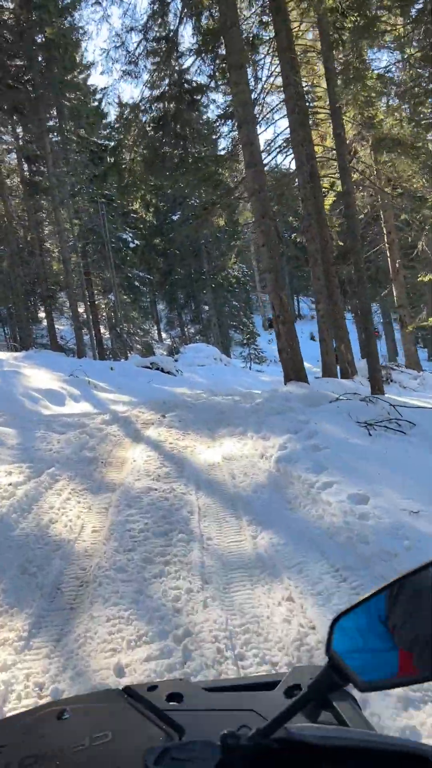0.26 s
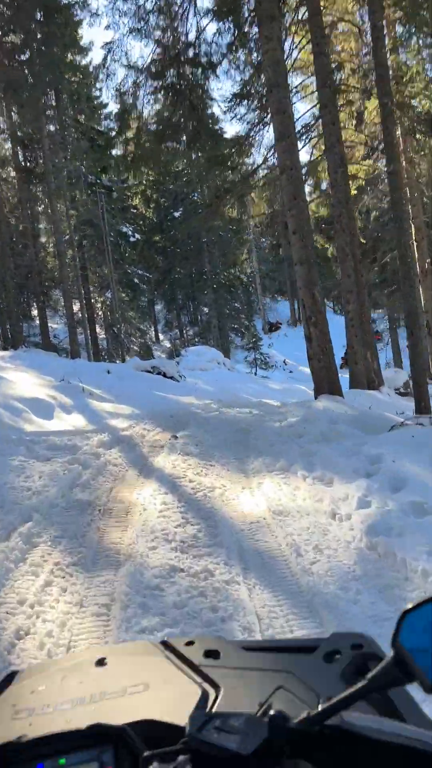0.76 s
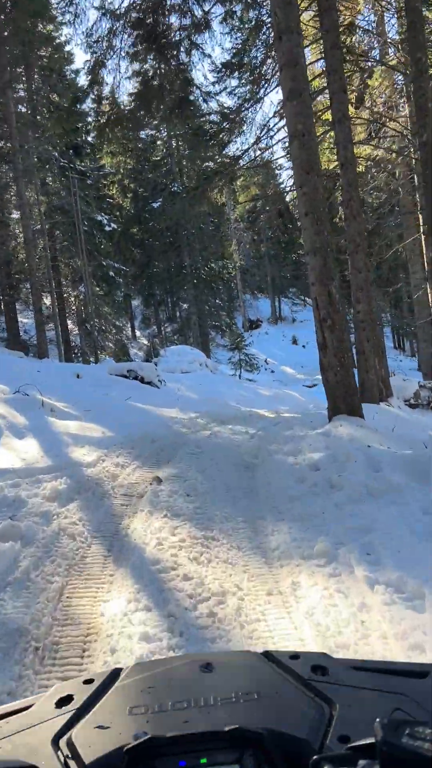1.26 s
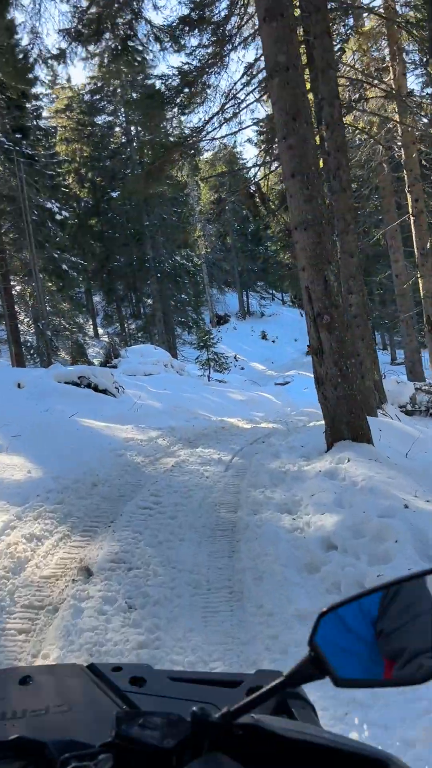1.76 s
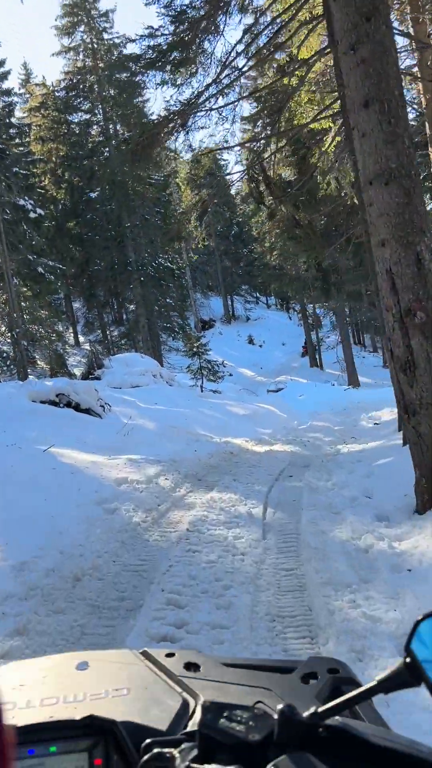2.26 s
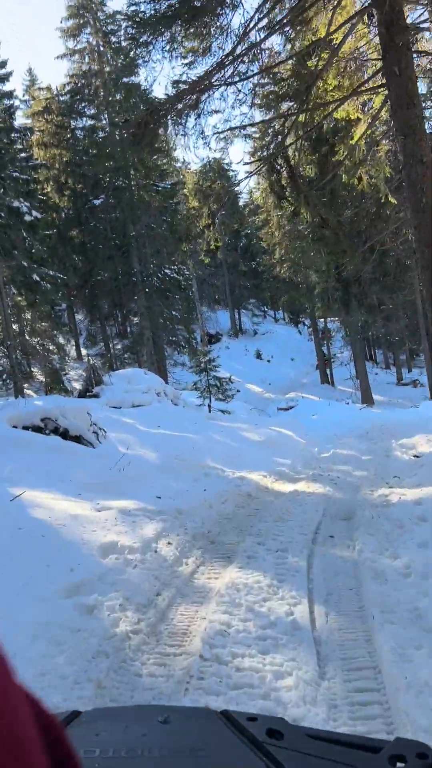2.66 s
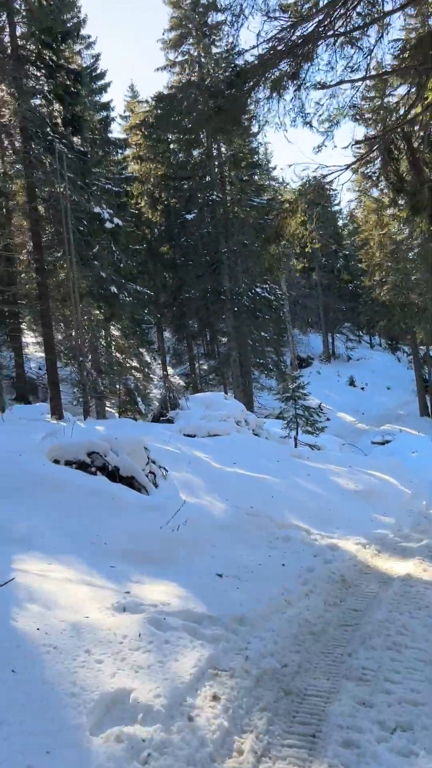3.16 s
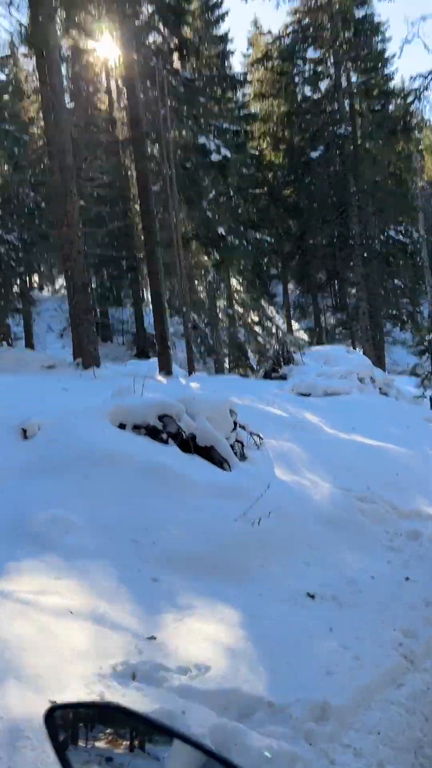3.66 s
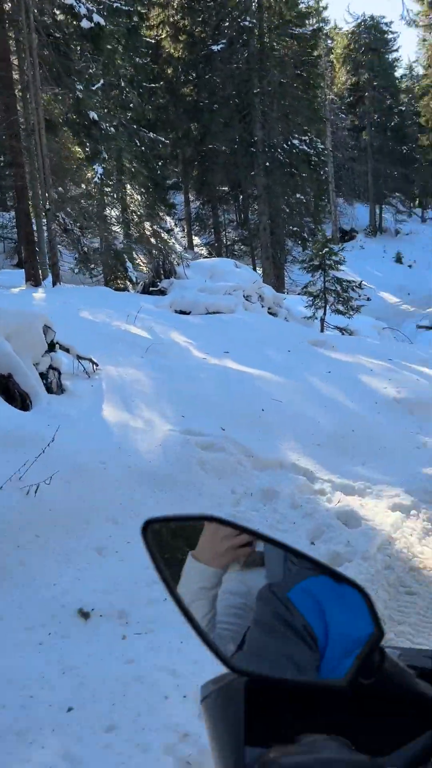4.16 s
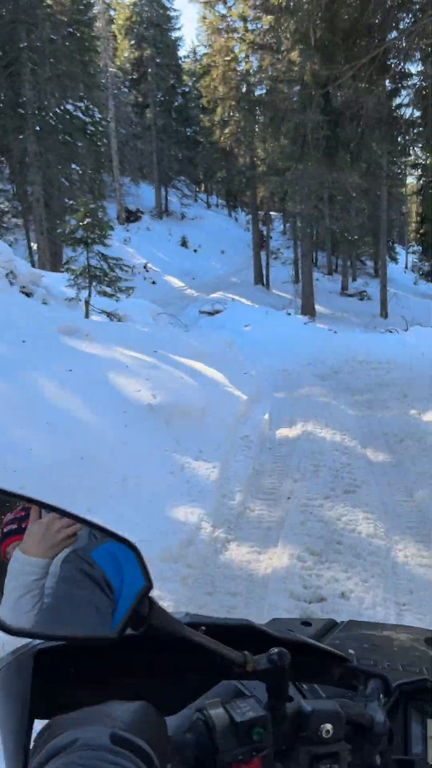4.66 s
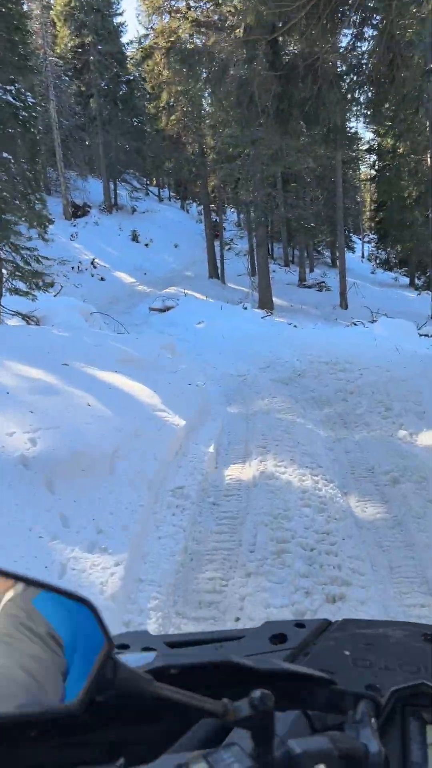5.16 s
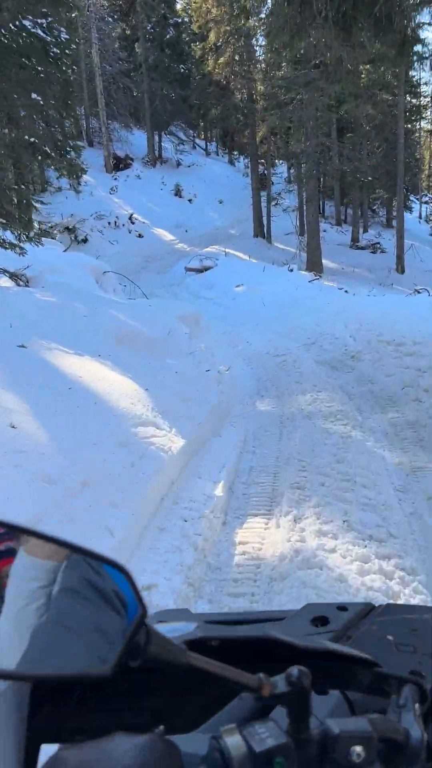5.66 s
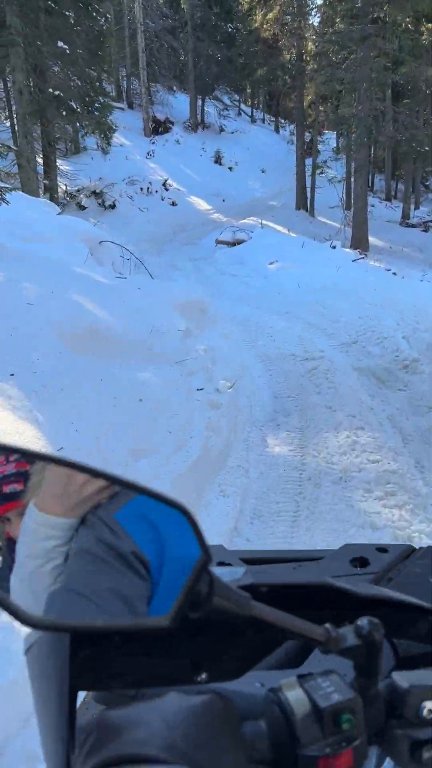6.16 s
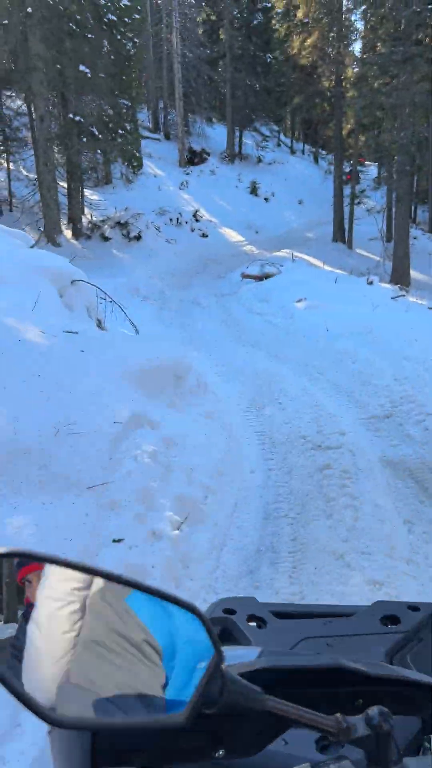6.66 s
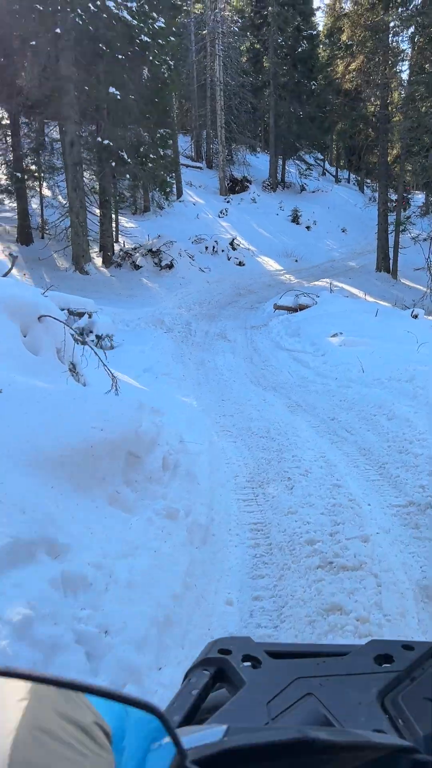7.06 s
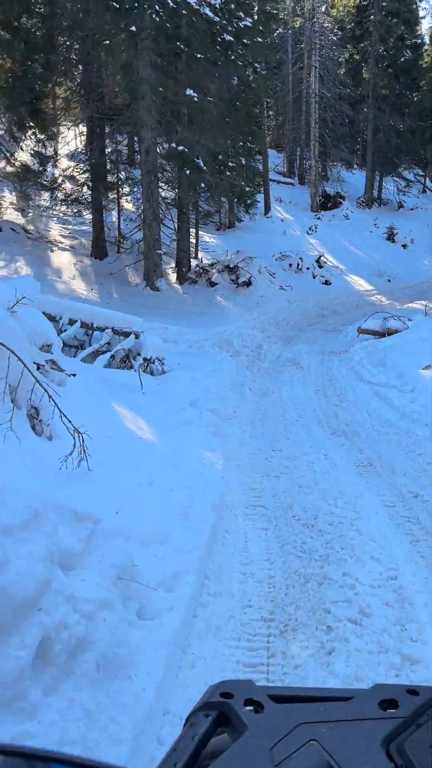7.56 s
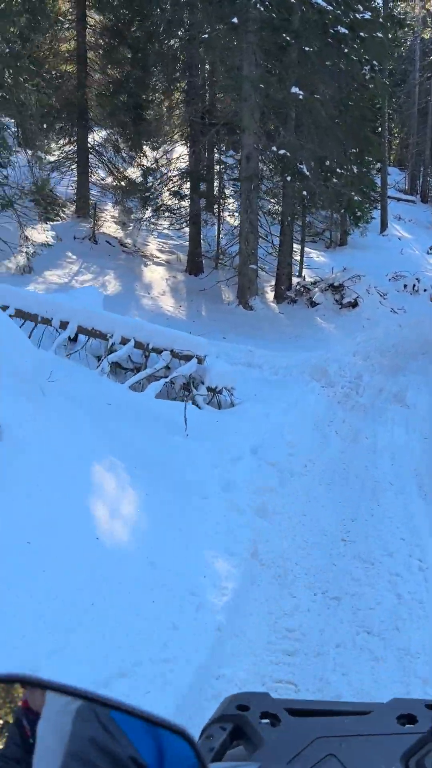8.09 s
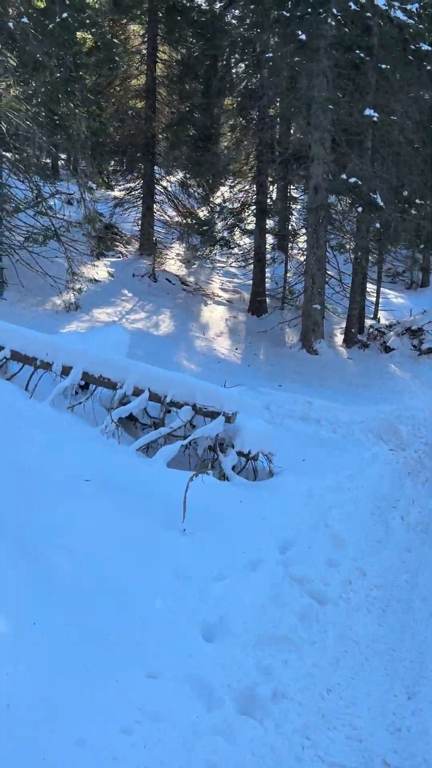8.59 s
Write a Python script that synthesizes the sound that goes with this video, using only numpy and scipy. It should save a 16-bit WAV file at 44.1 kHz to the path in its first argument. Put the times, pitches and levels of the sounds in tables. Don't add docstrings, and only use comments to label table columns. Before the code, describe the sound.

Heard from the saddle on a hand-held phone outdoors, a single-cylinder engine pulls hard with a rough, raspy drone and wind rumbling on the microphone. After about two and a half seconds, tiny high squeaks and a sharp gust mark the throttle closing. The engine drops to a lower, softer hum, swells mildly and eases again, over metallic ticking, hissing churned snow and low thumps from ruts.

```python
import sys
import numpy as np
from scipy import signal
from scipy.fft import rfft, irfft, next_fast_len
from scipy.io import wavfile
from scipy.ndimage import uniform_filter1d, map_coordinates

SR = 44100
rng = np.random.default_rng(int(sys.argv[2]) if len(sys.argv) > 2 else 0)


def volts_from_db(level):
    exponent = np.asarray(level, float) / 20
    return 10 ** exponent


def digitize_waveform(pressure):
    field = np.atleast_2d(pressure).T
    bounded = np.clip(field, -1, 1)
    quanta = np.round(bounded * 32767).astype(np.int16)
    wavfile.write(sys.argv[1], SR, quanta)


N = 389403

# (time [s], firing rate [Hz], exhaust effort [dB])
ENGINE = [(0.0, 40.02, -13), (0.37, 42.4, -16.5), (1.06, 39.74, -22), (2.09, 40.87, -22), (2.46, 39.9, -22),
          (2.75, 35.25, -23.5), (3.61, 34.22, -27), (3.86, 34.58, -23), (4.38, 37.55, -19),
          (4.67, 35.8, -21.5), (5.63, 34.77, -21.5), (5.9, 35.44, -20), (6.17, 34.4, -21.5),
          (6.39, 33.95, -23.5), (6.79, 36.08, -20.5), (7.8, 36.38, -21.5), (8.16, 34, -24.5),
          (8.83, 33.98, -25.5)]


def crank():
    firing_hz = curves(ENGINE)[0] * (1 + .003 * wobble(10))
    return np.cumsum(firing_hz) / SR + .07


def effort_swing():
    effort_db = curves(ENGINE)[1]
    return effort_db - effort_db.mean()


# (time [s], throttle opening [0-1])
THROTTLE = [(0, 0.82), (2.42, 0.83), (2.5, 0.43), (2.75, 0.24), (3.8, 0.32), (4.2, 0.4), (4.6, 0.05),
            (6.4, 0.14), (6.7, 0.26), (7.8, 0.24), (8.1, 0), (8.83, 0.01)]


def load():
    return np.clip(curves(THROTTLE)[0], 0, 1)


# (order, level re mean effort shut [dB], part open [dB], open [dB], growth [dB per dB effort])
STRONG_ORDERS = [(2, -13, -8.5, 7, .5), (4, 0, 1, -1, 1), (5, -16, -11.5, -1.5, 0.77),
                 (6, -13.5, -8.5, -17.5, 1.73), (7, -29, -13, -8.5, 1.32)]
# (order, level re roar open [dB], level re roar shut [dB])
WEAK_ORDERS = [(1, -5.5, -8), (3, -0.5, -4.5), (8, -4.5, -2), (9, -10.5, -16), (10, -12.5, -18.5),
               (14, -2, -26), (18, -14, -32), (20, -13.5, -29), (22, -46, -12), (24, -26, -12)]
# (frequency [Hz], width [Hz], level [dB])
PIPE = [(450, 70, -6), (565, 26, 3), (720, 24, 4), (808, 24, 3), (930, 26, -5), (1035, 35, -6)]
PART_OPEN = .3
LOPE_DB = 1.5
WEAK_PER_EFFORT = 0.1
SKEW_TURNS, RETURN_TURNS = .16, -.35


def exhaust(cycles):
    swing_db, flow_db, pull = effort_swing(), roar_db(), load()
    mean_db = curves(ENGINE)[1].mean()
    levels = {}
    for order, *steps_db, growth in STRONG_ORDERS:
        lope_db = (order != 4) * LOPE_DB * (1 - pull) * wobble(7)
        throttle_db = np.interp(pull, [0, PART_OPEN, 1], steps_db)
        levels[order] = mean_db + growth * swing_db + throttle_db + lope_db
    for order, open_db, shut_db in WEAK_ORDERS:
        levels[order] = flow_db + WEAK_PER_EFFORT * swing_db + shut_db + pull * (open_db - shut_db)

    tone = np.zeros(N)
    for order, db in levels.items():
        lag = (order % 2) * np.sign(order - 4) * SKEW_TURNS + (order == 6) * RETURN_TURNS
        waver = volts_from_db(.6 * order ** .4 * wobble(12))
        tone += np.sqrt(2) * volts_from_db(db) * waver * np.cos(2 * np.pi * (order * cycles - lag))

    firing = beats(cycles, scatter_db=3.0)
    firing = firing + (.7 - 0.12 * pull) * beats(cycles + .5, scatter_db=0.3)
    pipe_ring = unit(filtered(firing, lambda f: modes(PIPE)(f) * (f > 350)))
    tone += volts_from_db(flow_db + 0.64 * swing_db - 11.0 + 6.9 * pull) * pipe_ring
    return np.array([tone, 0.018 * tone])


ROAR_DB, ROAR_LOAD_DB, ROAR_PER_EFFORT = -29, 3, 0.29


def roar_db():
    return ROAR_DB + ROAR_LOAD_DB * load() + ROAR_PER_EFFORT * effort_swing()


# (frequency [Hz], level [dB])
ROAR = [(25, -31), (45, -7.5), (120, -5.5), (300, -3), (500, -6.5), (800, -6), (1200, -16), (2400, -25.5),
        (4000, -33.5), (8000, -44.5)]
# (frequency [Hz], gain [dB])
MUFFLED = [(25, 0), (800, 0), (880, -8), (1000, -5), (1120, 0), (20000, 0)]


def roar(cycles):
    puff = 1 + 0.092 * np.cos(2 * np.pi * cycles) + 0.091 * np.cos(4 * np.pi * cycles)
    gas = unit(filtered(puff * hiss(patchy_db=1.0), colour(ROAR)))
    pull = load()
    return volts_from_db(roar_db() + 2.5) * ((1 - pull) * gas + pull * filtered(gas, colour(MUFFLED)))


# (frequency [Hz], width [Hz], level [dB])
CASING = [(1030, 60, -2), (1330, 120, -9), (1590, 40, 1), (1810, 50, 0), (2000, 50, 1.5), (2290, 80, -7)]
CASING_OPEN = [(1628, 114, -3.5), (1820, 55, 5), (1997, 37, 4), (2020, 230, 1)]
HEAD = [(2530, 70, 0), (2660, 45, 1), (2940, 90, -4), (3300, 200, -10), (4900, 350, -11)]
HEAD_OPEN = [(2525, 55, 0), (2650, 70, -8), (3400, 250, -14), (5600, 500, -16)]
# (time [s], level [dB])
FACING = [(0, -30), (.65, -36), (1.6, -36), (2, -41.5), (2.75, -44.5), (3.1, -36), (3.8, -38), (4.4, -34.5),
          (7.7, -34), (8.83, -34.5)]
# (centre time [s], length [s], level [dB])
BUZZ = [
    (2, 1.85, 9),
    (3.15, 0.44, 13),
    (4.6, 1.01, 4.5),
    (6, 1.32, 4.5),
    (8.55, 1.106, -26),
]
KNOCK_DB, KNOCK_PER_WORK = -44.5, 1
SHARPEN = .2


def clatter(cycles):
    blow_sizes = volts_from_db(0.72 * rng.standard_normal(int(2 * cycles[-1]) + 2))
    strength = blow_sizes[(2 * cycles).astype(int)]
    strength = strength * np.where(cycles % 1 < .5, 1, .7)
    decay = np.exp(-(2 * cycles % 1) / 0.45)
    rough = unit((.5 + strength * decay) * hiss(patchy_db=-0.55))
    regular = unit(beats(cycles, scatter_db=-0.5) + 0.22 * beats(cycles + .47, scatter_db=-2.2))
    blows = rough + 0.61 * regular * np.array([[1], [.2]])
    pull = load() ** 1.78

    def body(table):
        response = modes(table)
        return unit(filtered(blows, lambda f: response(f) * np.abs(response(f)) ** SHARPEN))

    def ring(shut, wide):
        return (1 - pull) * body(shut) + pull * body(wide)

    casing = volts_from_db(curves(FACING)[0] - 2.0) * ring(CASING, CASING_OPEN)
    head_db = KNOCK_DB + KNOCK_PER_WORK * curves(TRACKS)[0] + swells(BUZZ)
    return casing + volts_from_db(head_db) * ring(HEAD, HEAD_OPEN)


# (time [s], level [dB])
TRACKS = [(0, 4.5), (.25, 3), (.9, 2.5), (1.9, -5), (2.5, -4.5), (3.2, -10.5), (3.45, -8.5), (3.8, -1),
          (4.4, 1), (5.3, 1), (5.9, 2), (6.25, 0), (6.75, 1), (7.5, -2), (7.9, 0), (8.4, -1.5),
          (8.83, -4.5)]
# (frequency [Hz], level [dB])
SNOW = [(800, -41), (1500, -2), (2400, 11), (3500, 7.5), (5000, 1.5), (7000, 0), (10000, -3), (15500, -10),
        (17000, -13)]
# (centre time [s], length [s], level [dB])
SPRAY = [(0.186, 0.029, -54), (0.462, 0.017, -49), (0.751, 0.033, -51), (0.797, 0.007, -44),
         (1.05, 0.023, -48), (1.656, 0.013, -48), (1.72, 0.0049, -48), (1.742, 0.037, -53),
         (2.37, 0.0086, -54), (2.384, 0.024, -52), (2.502, 0.039, -53), (2.707, 0.048, -55),
         (2.869, 0.036, -56), (3.581, 0.05, -53), (4.088, 0.0097, -49), (4.403, 0.031, -43),
         (4.596, 0.025, -50), (5.621, 0.0081, -54), (5.834, 0.023, -45), (6.165, 0.027, -52),
         (6.549, 0.0085, -46), (6.666, 0.01, -47), (6.737, 0.012, -41), (6.833, 0.019, -46),
         (7.097, 0.015, -46), (7.458, 0.034, -51.5), (7.729, 0.012, -49), (8.04, 0.008, -52),
         (8.227, 0.034, -46.5), (8.441, 0.02, -52)]
CHURN_DB = -51
DULL_DB, DULL_GROWS = -53, 0.79


def snow(cycles):
    restless = volts_from_db(0.93 * wobble(40) + .5 * np.cos(2 * np.pi * cycles))
    grains = unit(filtered(hiss(patchy_db=1.0), colour(SNOW)))
    churn = volts_from_db(CHURN_DB + curves(TRACKS)[0] + 9.5) * restless * grains
    bright, dull = np.zeros(N), np.zeros(N)
    for s, length, db in SPRAY:
        swell = np.hanning(round(1.34 * length * SR)) ** 0.64
        start = round(s * SR) - len(swell) // 2
        bright[start:][:len(swell)] += volts_from_db(db + 7.0) * swell
        dull[start:][:len(swell)] += volts_from_db(DULL_DB + DULL_GROWS * (db + 51) + 4.0) * swell
    bright_hz_db = [(8000, -30), (10500, -11), (13500, -2), (17000, -3)]
    dull_hz_db = [(3000, -22), (5500, -7), (9500, -3), (11500, -27)]
    high = unit(filtered(hiss(patchy_db=-0.5), colour(bright_hz_db)))
    low = unit(filtered(hiss(patchy_db=1.5), colour(dull_hz_db)))
    return churn + bright * high + dull * low


# (centre time [s], length [s], level re smooth going
# [dB])
RUTS = [(0.1, .5, -41), (2.9, .5, 5), (3.5, .45, -37), (4.9, .75, 8), (5.45, .6, 2.5), (5.8, 0.51, 5),
        (6.25, 0.97, 0), (6.9, 0.48, -7), (7.4, 0.52, 1), (7.85, 0.64, 7), (8.4, .45, 3)]
SMOOTH_DB = -36


def frame():
    turns = np.cumsum(62 + 6.8 * wobble(11)) / SR
    boom = volts_from_db(2.2 * wobble(14)) * np.sin(2 * np.pi * turns)
    return volts_from_db(SMOOTH_DB + swells(RUTS) + 4.5) * unit(boom) * np.array([[1], [.1]])


# (centre time [s], length [s], first pitch [Hz], last pitch [Hz], level [dB])
SQUEAKS = [(1.658, .009, 6950, 7000, -48), (1.722, .012, 7200, 6700, -47), (1.752, .014, 6850, 7150, -47),
           (1.75, .025, 10500, 10400, -52), (2.365, .012, 11400, 11400, -53),
           (2.397, .016, 7000, 7050, -46), (2.401, .012, 8150, 8200, -47), (2.432, .025, 9000, 9000, -52),
           (2.502, .04, 11400, 11400, -54), (2.624, .02, 7150, 6900, -48), (2.687, .018, 9050, 9000, -44),
           (2.71, .03, 7050, 7150, -52), (4.4, .036, 13000, 13100, -51), (4.4, .02, 7000, 7000, -48),
           (4.405, .03, 8300, 8300, -52), (6.833, .012, 13700, 13700, -48)]
# (centre time [s], length [s], first pitch [Hz], last pitch [Hz], level [dB])
WHINE = [
    (1.92, .4, 1200, 1255, -46),
    (2.95, .5, 1095, 1040, -42.5),
    (3.12, .45, 1050, 1000, -43.5),
    (4.35, .6, 1790, 1835, -46.5),
    (.3, .5, 1760, 1820, -43),
    (6, .8, 2650, 2655, -50),
    (2, .9, 2515, 2530, -50),
]


def fitting():
    return glides(SQUEAKS, blur_hz=60) + glides(WHINE, blur_hz=14)


# (frequency [Hz], level [dB])
BUFFET = [(25, -42), (60, 4.5), (150, 10), (300, 4), (600, 1), (1100, -23.5), (2500, -82)]
FLUTTER = [(150, -35), (350, 17), (750, -12), (900, -10), (1500, -18), (3000, -58)]
# (centre time [s], length [s], level above the steady stream [dB])
GUSTS = [
    (.3, 0.64, 3.5),
    (.8, 0.31, 4),
    (2.1, 0.81, 3),
    (2.41, 0.23, 7.5),
    (2.56, 0.14, 13),
    (3.5, .6, 4.5),
    (4.95, 1.1, 2),
    (8.3, 0.85, 4.5),
]
STREAM_DB, STREAM_LOAD_DB = -33, 9


def wind():
    slow = np.array([wobble(14), wobble(14)])
    quick = np.clip([wobble(45), wobble(45)], -3, 2)
    lumps = volts_from_db(1.2 * slow + 3.5 * quick)
    gust_db = STREAM_DB + STREAM_LOAD_DB * load() + swells(GUSTS) + 21
    buffet = volts_from_db(0.88 * gust_db - 19.5) * unit(filtered(lumps * hiss(patchy_db=0.0), colour(BUFFET)))
    pops = volts_from_db(7 * np.minimum(wobble(70), 2.2)) * rng.standard_normal(N)
    flutter = volts_from_db(0.79 * np.minimum(gust_db, -1.5) - 39.5) * unit(filtered(pops, colour(FLUTTER)))
    return buffet + flutter * np.array([[1], [.25]])


# (frequency [Hz], left lead [radians], likeness [0-1], left minus right level [dB])
PORTS = [(0, 0, .99, -1), (200, -.1, .88, -2), (350, -.15, .55, -3), (650, -1.7, .55, -4.5),
         (1250, -1, .75, -1.5), (1600, -.4, .99, -1), (2000, .5, .99, -2), (2300, 1.4, .8, -4),
         (2500, 2.8, .9, 0), (3000, 2.3, .88, 0), (4400, 1.8, .72, -1), (4900, .9, .6, -2),
         (5950, 3.14, .95, 0), (8000, 6.28, .93, 0), (10250, 9.42, .96, 0), (12400, 12.57, .92, 0),
         (15000, 15.7, .95, 0), (22050, 22, .95, 0)]


def ports(pair):
    hz, lead, alike, tilt_db = np.transpose(PORTS)

    def share(f):
        angle = np.arccos(np.interp(f, hz, alike)) / 2
        return np.array([np.cos(angle), np.sin(angle)])

    def skew(f):
        left = volts_from_db(np.interp(f, hz, tilt_db) / 2) * np.exp(.5j * np.interp(f, hz, lead))
        return np.array([left, 1 / left])

    direct, scattered = filtered(pair, share)
    return filtered(np.array([direct + scattered, direct - scattered]), skew)


def beats(cycles, scatter_db):
    whole = np.arange(1, int(cycles[-1]))
    at = np.interp(whole, cycles, np.arange(N))
    size = volts_from_db(scatter_db * rng.standard_normal(len(whole)))
    first, late = at.astype(int), at % 1
    return np.bincount(first, size * (1 - late), N) + np.bincount(first + 1, size * late, N)


def glides(table, blur_hz):
    x = np.zeros(N)
    pitch = blur_hz * wobble(blur_hz * 2)
    size = volts_from_db(2 * wobble(blur_hz * 2))
    for s, length, first_hz, last_hz, db in table:
        n = round(length * SR)
        start = max(round(s * SR) - n // 2, 0)
        span = slice(start, start + n)
        turns = np.cumsum(np.linspace(first_hz, last_hz, n) + pitch[span]) / SR
        x[span] += volts_from_db(db + 5.0) * size[span] * np.hanning(n) ** .5 * np.sin(2 * np.pi * turns)
    return x * np.array([[1], [.1]])


def hiss(patchy_db):
    z = signal.stft(rng.standard_normal((2, N)), nperseg=512)[2]
    field = uniform_filter1d(rng.standard_normal(z.shape[1:]), 8, 0)
    field = uniform_filter1d(field, 8, 1)
    return signal.istft(z * volts_from_db(patchy_db * unit(field)), nperseg=512)[1][:, :N]


def modes(table):
    def response(f):
        total = 0
        for k, (centre, width, db) in enumerate(table):
            damping = 1j * f * width
            total = total + (-1) ** k * volts_from_db(db) * damping / (centre * centre - f * f + damping)
        return total
    return response


def colour(points):
    hz, db = np.transpose(points)
    return lambda f: volts_from_db(np.interp(np.log(f + 1), np.log(hz), db))


def filtered(x, response):
    m = next_fast_len(N + SR // 4)
    return irfft(rfft(x, m) * response(np.fft.rfftfreq(m, 1 / SR)), m)[..., :N]


def unit(x):
    return x / np.sqrt(np.mean(x ** 2) + 1e-20)


def curves(rows):
    s, *cols = np.transpose(rows)
    return [np.interp(np.arange(N) / SR, s, c) for c in cols]


def wobble(rate):
    knots = rng.standard_normal(int(N * rate / SR) + 4)
    return map_coordinates(knots, [np.arange(N) * rate / SR])


def swells(events):
    t = np.arange(N) / SR
    return sum(db * np.cos(np.pi * np.clip((t - s) / length, -.5, .5)) ** 2 for s, length, db in events)


def scene():
    cycles = crank()
    vehicle = exhaust(cycles) + roar(cycles) + clatter(cycles) + snow(cycles) + frame() + fitting()
    return ports(vehicle) + wind()


def roll_off(x):
    return signal.sosfilt(signal.butter(12, 15620, fs=SR, output="sos"), x)


def record(dry):
    ceiling = .95
    mix = dry / (1 + np.abs(dry / ceiling) ** 6) ** (1 / 6)
    return roll_off(mix)


dry = scene()
out = record(dry)
digitize_waveform(out)
```